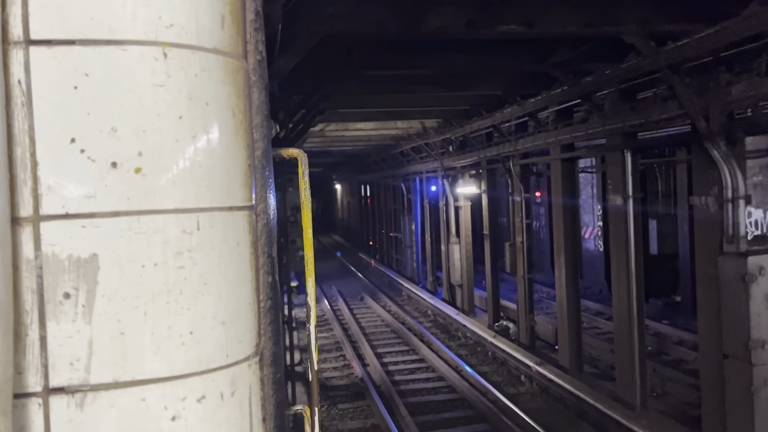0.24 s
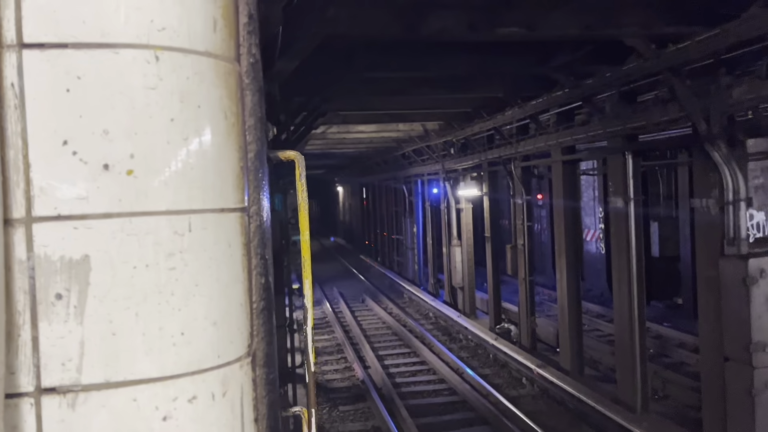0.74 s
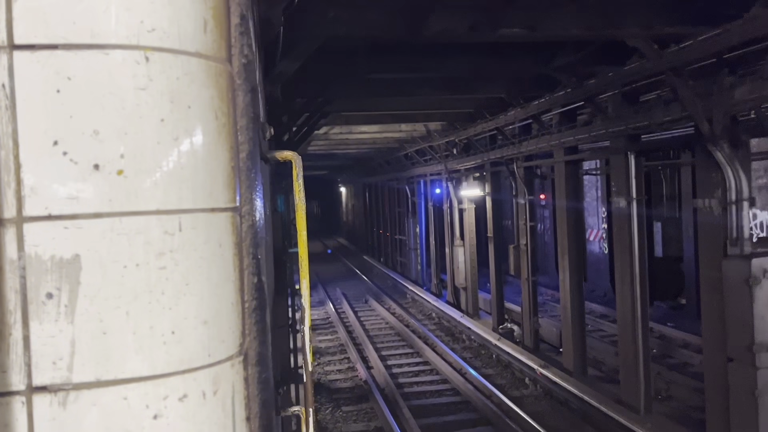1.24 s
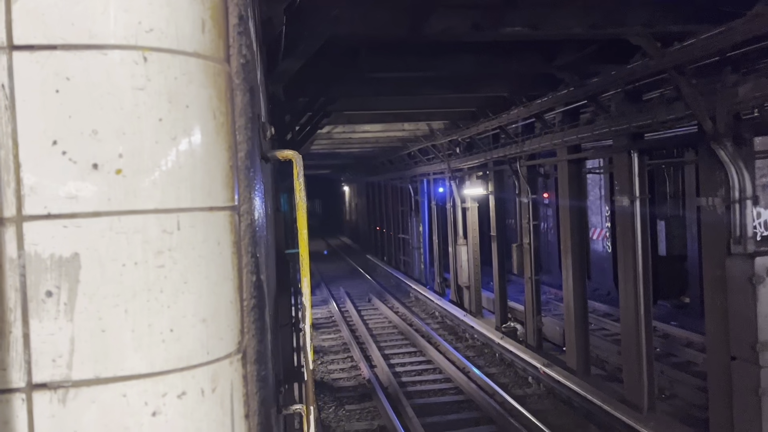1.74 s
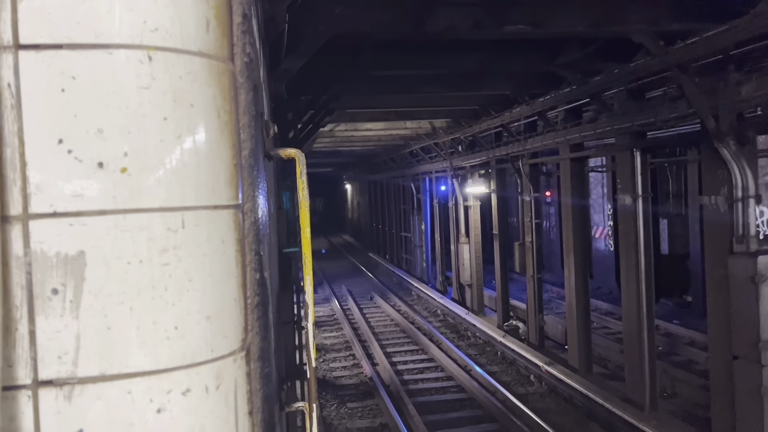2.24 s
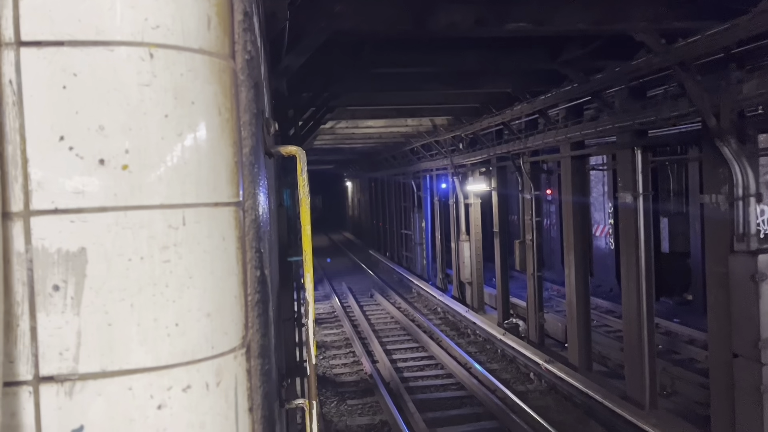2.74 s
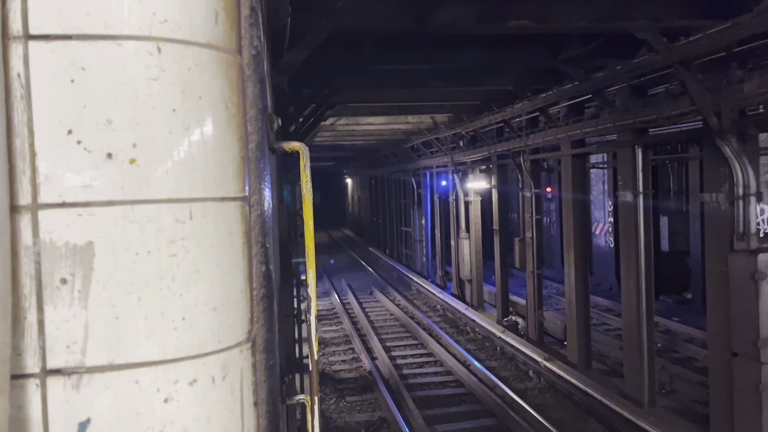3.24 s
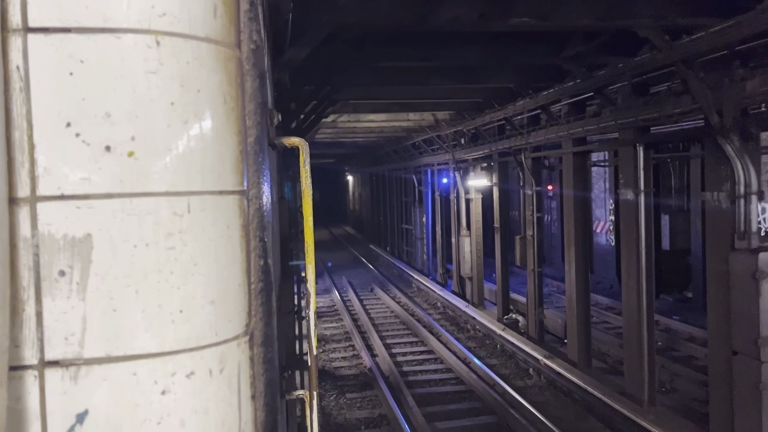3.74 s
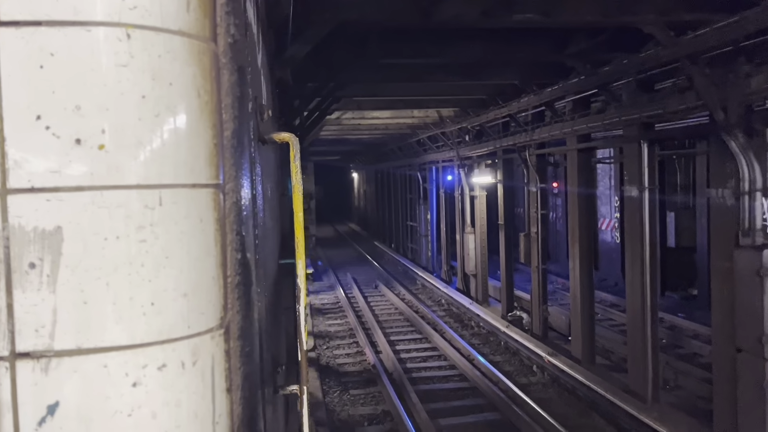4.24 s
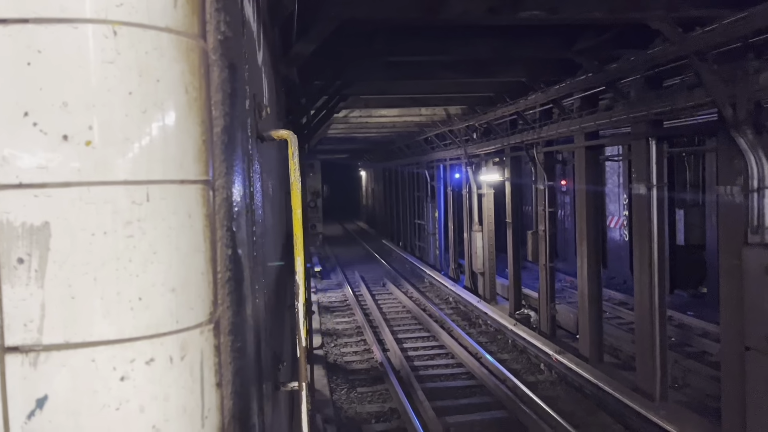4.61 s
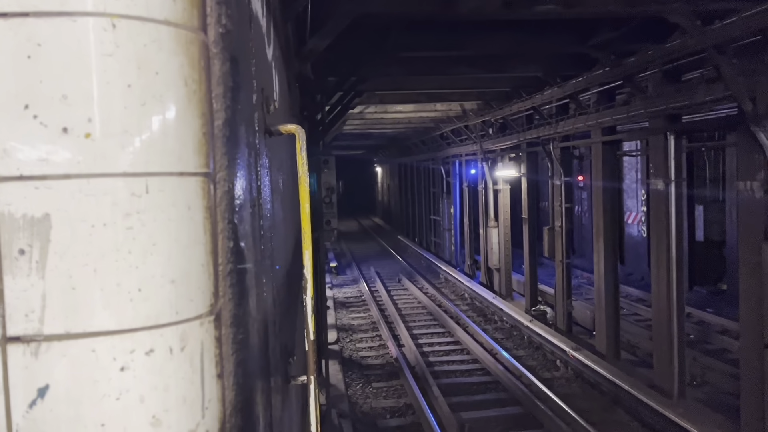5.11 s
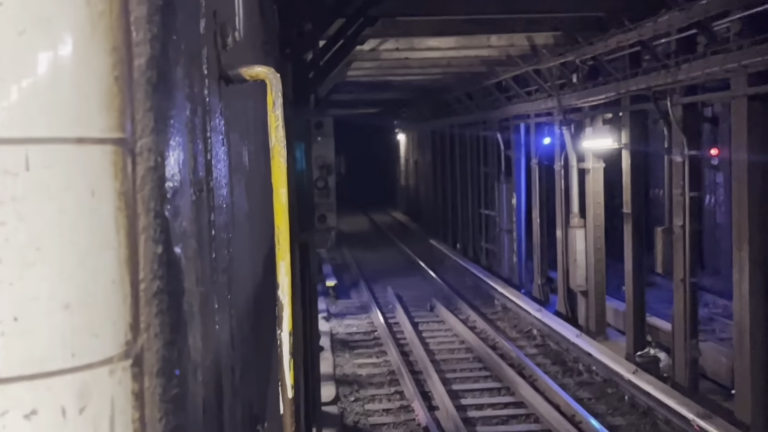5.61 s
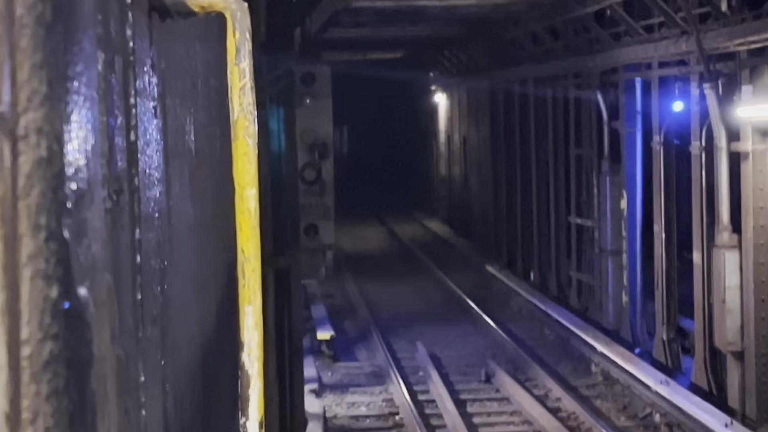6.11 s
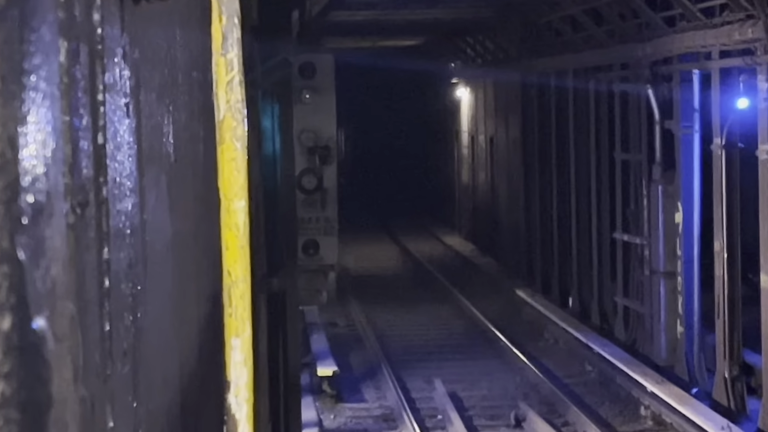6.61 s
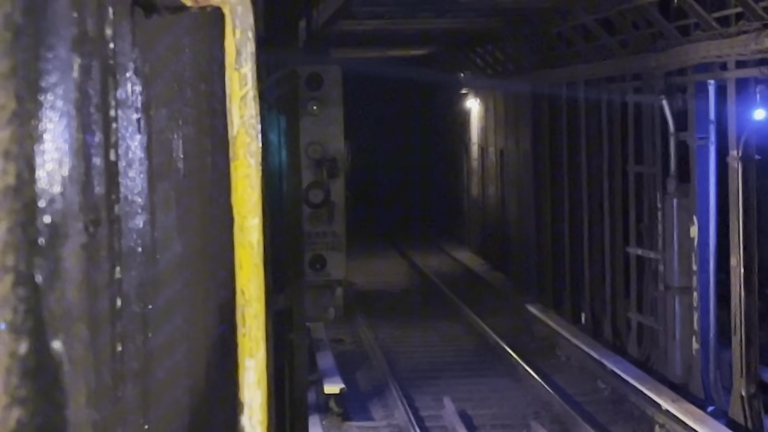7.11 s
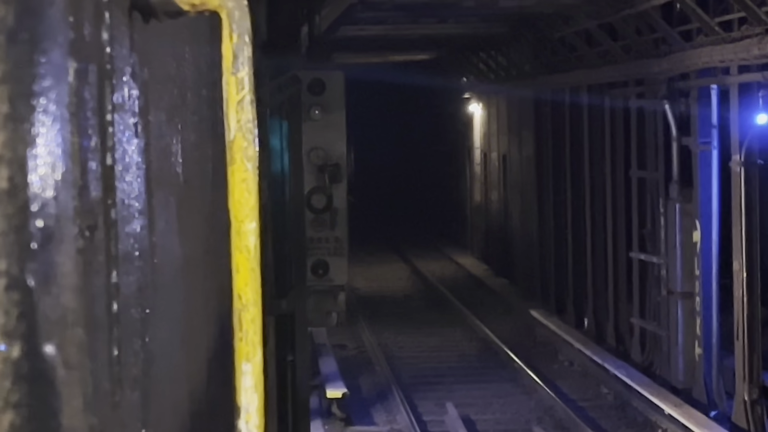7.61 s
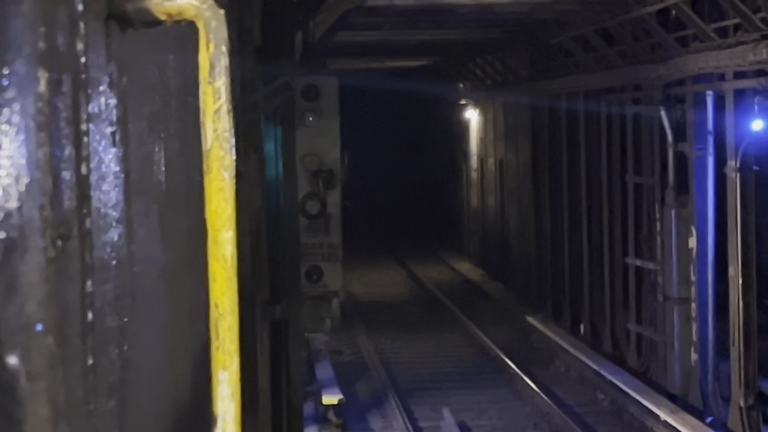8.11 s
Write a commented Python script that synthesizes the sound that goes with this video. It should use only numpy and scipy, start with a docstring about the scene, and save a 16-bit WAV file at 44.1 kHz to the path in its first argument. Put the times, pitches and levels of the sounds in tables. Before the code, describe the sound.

At the end of an underground platform, a phone picks up low tunnel roar and hiss while an unseen train approaches. Deep rumble beats unevenly, rails ring faintly and a motor whine swells, then fades as a finger creaks on the case. After five seconds the rumble surges; the pick-up narrows towards the tunnel, the whine returns, rolling hiss rises and a dull knock comes near the end.

```python
"""An unseen underground train draws nearer along a tunnel, heard by a phone at the end of the platform.
From the start a rumble beats unevenly in low tunnel resonances over roar and hiss; rails ring, gear buzzes,
a squeal slides. A motor whine swells, and as it starts to fade a finger creaks on the phone's case.
Near 5.5 s the pick-up narrows towards the tunnel, changing colour and stereo width; the rumble is stronger
by then, the whine swells again, rolling hiss comes up and a dull knock falls close to the end."""
import sys
import numpy as np
from scipy import signal
from scipy.fft import rfft, irfft, next_fast_len
from scipy.io import wavfile

SR = 44100
rng = np.random.default_rng(int(sys.argv[2]) if len(sys.argv) > 2 else 0)


def wav_record(signal):
    """Record a signal, one row per channel, as 16-bit PCM in the file named by sys.argv[1]."""
    frames = np.transpose(np.atleast_2d(signal))
    bounded = np.clip(frames, -1, 1)
    # unit amplitude maps onto the largest positive 16-bit level
    quanta = np.round(bounded * 32767).astype(np.int16)
    wavfile.write(sys.argv[1], SR, quanta)


N = 368235
SIZE = next_fast_len(N)
HZ = np.maximum(np.arange(SIZE // 2 + 1) * SR / SIZE, 1)   # frequency of each bin
T = np.arange(N) / SR   # seconds

NARROWING_S = (5.52, 5.6)   # start and end of the change of pick-up

# Microphone hiss colour. Each row: frequency in Hz, relative density in dB per Hz.
HISS_COLOUR = [(3000, -21), (5000, 0.5), (7000, 0), (9000, 4.5), (12500, 2), (14500, 5), (15800, -20)]
# Hiss level. Each row: time in seconds, level in dB.
HISS_LEVEL = [(0., -68), (1.8, -67), (4., -63), (8.35, -62)]
# Above in-step, the two sides of the hiss slip one cycle per turn.
HISS_IN_STEP_HZ, HISS_TURN_HZ = 4450, 7400

# Roar of tunnel and station through each pick-up. Each row: frequency in Hz, left and right relative density
# in dB per Hz, share alike in phase (-1 to 1), share alike with the right a quarter cycle ahead.
ROAR_WIDE = [(30.26, -14.5, -11, 0.96, -0.25), (93, -4.5, -6.5, 0.68, -0.2), (124, -26, -25, 0.063, -0.077),
             (141.5, -7, -5.5, 0.97, 0.26), (187, -7, -7, 0.91, 0.071), (307, -16, -18, 0.69, 0.78),
             (334, -19, -19, 0.89, 0.14), (515, -19, -19, 0.23, -0.15), (796, -21.5, -23.5, 0.18, -1.05),
             (1600, -28, -32.5, -0.36, 0.58), (2200, -34, -34, -0.012, -0.49),
             (3700, -36, -39.5, -0.3, 0.16), (5180, -42, -64, -0.45, 0.23), (9300, -60.5, -54, 0.71, 0.096)]
ROAR_NARROW = [(30.3, -18, -11, 0.93, 0.), (88.5, 2, 2.5, 1, -0.15), (117.5, -6.5, -7.5, 1, -0.32),
               (177.5, -6.5, -7.5, 0.95, 0.), (283, -17, -17, 0.79, -0.46), (355, -20, -22.5, 0.93, -0.23),
               (643, -25, -25, 0.3, 0.2), (830, -29.5, -42.5, 0.11, -0.18), (1350, -30.5, -29, -0.41, 0.23),
               (1910, -48, -37, -0.68, -0.31), (1890, -34.5, -34, 0.97, -0.054),
               (3860, -47, -42, .999, -0.004), (4800, -48.5, -50, .999, 0.), (6840, -46.5, -46, 0.94, .5)]
# Standing waves of the station that lift the roar. Each row: frequency in Hz, width in Hz, lift in dB.
STATION_MODES = [(156.7, 5, 7.5), (175, 4.2, 2), (190.5, 5.4, 3.5), (204, 6, 3), (222.1, 4.6, 5),
                 (253, 6, 3.5), (277, 6, 3), (308, 8.8, 5), (344, 26.5, 6), (388, 20, 5)]
ROAR_DB, NARROW_GAIN_DB = -36.5, 4.5   # the narrow pick-up lifts the roar from the tunnel

# Two low resonances of the station. Each row: frequency in Hz, width in Hz.
DRONE_MODES = [(111, 8.6), (127, 16.4)]
# Their levels, with chance beats written out. Each row: time in seconds, lower level in dB, upper level in dB.
DRONE_LEVEL = [(0., -45, -37.5), (0.199, -43, -33.5), (.5, -41, -40), (.9, -44.5, -36), (1.2, -37, -40.5),
               (1.45, -50, -36.5), (1.9, -35, -34), (2.55, -48, -39), (3., -37.5, -33.5), (3.6, -36.5, -37),
               (3.95, -41, -37.5), (4.3, -37.5, -33), (4.9, -37, -38.5), (5.15, -30, -43),
               (5.35, -45, -41.5), (5.65, -35.5, -33.5), (6.2, -35, -35.5), (6.4, -41, -47),
               (6.8, -37.5, -36.5), (7.5, -41.5, -40.5), (7.75, -46, -47), (8.25, -34.5, -37),
               (8.35, -34, -38)]
DRONE_SIDE_DB = -20.5   # part that is opposite in the two sides

# Buzz of electrical gear. Each row: multiple of the buzz frequency, relative level in dB.
BUZZ_LINES = [(14, -82), (17, -81), (26, -79.5), (27, -88.5), (28, -77.5)]
# Gain of the whole buzz. Each row: time in seconds, gain in dB.
BUZZ_GAIN = [(0., -6), (4., -5), (5.5, 5), (8.35, 4)]
BUZZ_HZ = 120.03   # twice the mains frequency

# Rushes of noise. Each row: time of the top in seconds, length in seconds, low and high edge in Hz, level in dB.
RUSTLES = [(2.405, 0.09, 5000, 10500, -61.5), (5.25, 0.42, 6040, 6600, -66),
           (5.272, 0.45, 5310, 10200, -63), (7.086, 0.16, 1298, 2190, -52.5), (4.15, 1.1, 3440, 7100, -68),
           (6.52, 0.22, 3500, 7400, -64)]
# One dull knock: time of the top in seconds, pitch there in Hz, pitch slope in Hz per second, length in seconds,
# level in dB, left minus right in dB.
KNOCK = (7.836, 700, -170000, .005, -36, -5)
# Slips of a finger on the case near the right port. Each row: start in seconds, peak in dB, top frequency in Hz.
CREAK_SLIPS = [(2.3265, -44, 7000), (2.3405, -40, 3000), (2.372, -31, 7000), (2.3855, -37, 9000),
               (2.391, -38, 4500), (2.395, -35, 10500), (2.399, -36, 10500), (2.403, -39, 10500),
               (2.409, -35, 10500), (2.414, -41, 10500), (2.4335, -39, 4000), (2.4535, -35, 2500)]
# Ringing of the case. Each row: frequency in Hz, level in dB against the click, 60 dB decay time in seconds.
CASE_MODES = [(1150, -2, .006), (9700, -10, .003)]
CREAK_PAN_DB = -7   # left minus right

# Level of the track's many rings. Each row: time in seconds, level in dB before the narrow pick-up shades it.
CLANGOUR_LEVEL = [(0., -47), (1.5, -48.5), (2.2, -48.5), (4.3, -48.5), (5.2, -53), (8.35, -56.5)]
CLANGOUR_HZ = (720, 1660)   # range the rings are spread around

# Rings that never stop. Each row: frequency in Hz, width in Hz, level in dB with wide pick-up, level in dB with
# narrow pick-up, left minus right in dB, share alike in the two sides.
STEADY_RINGS = [(1522, 14, -66, -64, -8, -0.93), (1392, 36, -83, -69, -8, -0.2),
                (1564, 18, -72, -68, -5, 0.5)]
# Rails ringing briefly under far wheels. Each row: time of the top in seconds, pitch there in Hz,
# glide in Hz per second, length in seconds, nominal level in dB, left minus right in dB.
RINGS = [(0.082, 1160, -300, 0.27, -49.5, -1), (0.309, 1144, -300, 0.17, -44, 3),
         (0.34, 1108, -100, 0.13, -42.5, -3), (0.553, 1153, 100, 0.13, -51, 5),
         (0.803, 1450, 100, .25, -55, 0), (1.055, 1558, 30, 0.31, -52, -8),
         (1.198, 1180, -150, 0.23, -48, 2), (1.263, 1145, 200, 0.14, -51, 0),
         (1.418, 1190, -300, 0.055, -46, 8), (1.848, 1332, 27, 0.48, -56, 9),
         (2.03, 1018, 50, 0.22, -43.5, 2), (2.117, 1527, 120, 0.33, -52, -4),
         (2.15, 1316, 30, 0.27, -55, 4), (2.346, 1131, -27, 0.42, -50, -1), (2.53, 1129, 32, 0.2, -43, 0),
         (2.671, 1041, -50, 0.09, -44, 2), (2.8, 1145, -50, 0.22, -47.5, 3), (3.2, 1570, 0, 0.19, -56, -4),
         (3.622, 1470, 62, 0.38, -54, -8), (3.876, 1452, 40, 0.41, -51.5, -6), (3.95, 1331, 0, .2, -53, 2),
         (4.059, 1387, 50, .15, -53, -4), (4.075, 1540, 150, 0.36, -51.5, -4),
         (5.054, 1549, -53, 0.22, -58, 17), (5.258, 1190, 10, 0.13, -51.5, 11),
         (6.205, 1404, -61, 0.33, -57, -10), (7.119, 1174, 8, 0.22, -54, 6),
         (7.35, 1545, 11, 0.26, -60, -10), (7.97, 1528, 12, 0.39, -58, -9)]

# Ringing strands in the rolling hiss. Each row: frequency in Hz, width in Hz, relative level in dB.
ROLLING_STRANDS = [(1680, 18, 0), (1702, 12, 1), (1744, 12, -3), (1772, 14, 1.5), (1801, 12, 0),
                   (1790, 300, 0)]
# Rolling level. Each row: time in seconds, level in dB before flutter.
ROLLING_LEVEL = [(0., -64), (5.52, -67.5), (5.62, -60.5), (6.15, -56), (6.6, -56.5), (7., -58), (7.4, -58),
                 (7.55, -59), (7.65, -53.5), (7.95, -58), (8.1, -60), (8.35, -59)]
ROLLING_PAN_DB, ROLLING_LIKENESS = -7, 0.68   # left minus right, share alike in the two sides

# A thin, rough squeal. Each row: time in seconds, pitch in Hz, level in dB before flutter.
SQUEAL = [(0., 3620, -58), (.5, 3530, -62.5), (1.2, 3620, -63.5), (1.7, 3700, -67), (2.1, 3800, -65.5),
          (2.4, 3980, -61), (2.46, 3980, -72), (2.5, 3580, -64), (3.2, 3600, -77), (6.2, 3780, -65.5),
          (8.35, 3700, -76)]

# Motor tones. Each row: frequency in Hz, width in Hz before any blur, relative level in dB.
WHINE_TONES = [(2531, 16, 3), (2594, 16, 2), (2463, 16, -2), (2580, 190, -5)]
# Two swells. Each row: full strength in seconds, start of the fade in seconds, level in dB before flutter.
WHINE_SWELLS = [(1.304, 2.28, -56.5), (5.6, 6.7, -59)]
WHINE_RISE_DB_PER_S, WHINE_FADE_DB_PER_S, WHINE_REST_DB = 8, 36, -83
WHINE_SECOND_S = 3.5   # the second swell's tones sound from here
WHINE_BLUR = 1.3   # they are rougher: this many times wider

# Rumble of the nearing train, with its chance beats written out. Each row: time in seconds, level of the lower
# resonance in dB, level of the upper resonance in dB, pitch of the upper resonance in Hz.
RUMBLE = [(0., -36, -35.5, 70.3), (.25, -34, -38, 67.2), (.8, -39.5, -42, 76.3), (1.4, -39, -40, 78),
          (1.75, -35.5, -36.5, 76), (2.1, -37.5, -36.5, 70.2), (2.55, -29.5, -42.5, 70.2),
          (3.2, -36, -38, 77), (3.6, -34, -35, 70.4), (4., -31, -35, 69.8), (4.3, -30, -33.5, 69.7),
          (4.7, -28, -33.5, 67.9), (4.95, -30, -32, 68.74), (5.15, -32.5, -24, 70.05),
          (5.35, -19.5, -26.5, 69.76), (5.5, -37, -20.5, 70), (5.65, -25.5, -28, 71),
          (5.8, -19.5, -26.5, 71.6), (6.05, -37, -28.5, 72.85), (6.3, -22.5, -29.5, 73.66),
          (6.5, -31, -33, 74.5), (6.65, -23, -22.5, 75.7), (6.88, -22, -26.5, 75.15),
          (7.02, -36, -20, 73.77), (7.15, -30, -24.5, 74.15), (7.33, -18.5, -30.5, 75),
          (7.52, -20.5, -46, 76), (7.63, -34.5, -25.5, 77.2), (7.83, -18.5, -26.5, 76.23),
          (8.02, -33.5, -28.5, 77.66), (8.25, -21.5, -27, 77.7), (8.35, -20, -36, 77.5)]
# Pitch of the lower resonance. Each row: time in seconds, pitch in Hz.
LOWER_PITCH = [(0., 58), (3., 56.62), (4.7, 58.01), (5.8, 59.63), (8.35, 59.84)]
RUMBLE_WIDTHS_HZ = (6.5, 8.3, 11, 36)   # lower, upper, third, and a broad boom
THIRD_HZ, THIRD_MODE_DB = 93.2, -11   # the third follows the upper one, this much weaker
BOOM_HZ, BOOM_DB = 61.67, -4.5   # the boom follows the mean dB of lower and upper
RUMBLE_SIDE_DB = -27.5   # part that is opposite in the two sides
SETTLING_S, SETTLED_TONE = (4.5, 5.8), 1.6   # a steady tone joins the noise of lower and upper as the train nears


def from_db(db):
    """Gain of a level in dB."""
    return 10 ** (np.asarray(db) / 20)


def rms_one(x):
    """Scale a sound to rms 1, both sides together."""
    return x / np.sqrt(np.mean(x ** 2) + 1e-20)


def in_time(rows):
    """The columns of a time curve, sample by sample."""
    s, *columns = np.transpose(rows)
    return [np.interp(T, s, c) for c in columns]


def in_pitch(rows):
    """The columns of a spectrum, bin by bin along log frequency."""
    hz, *columns = np.transpose(rows)
    return [np.interp(np.log(HZ), np.log(hz), c) for c in columns]


def panned(pan_db):
    """Gains of the two sides for a left-minus-right level."""
    return from_db(np.array([[.5], [-.5]]) * pan_db)


def peak(hz, width_hz):
    """Gain per bin of a resonance passed twice; half gain at the edges of its width."""
    return 1 / (1 + (2 * (HZ - hz) / width_hz) ** 2)


def peaks(rows, blur=1):
    """Gain per bin of several resonances together."""
    return sum(from_db(db) * peak(hz, width_hz * blur) for hz, width_hz, db in rows)


def swell(s, length):
    """A smooth bell-shaped rise and fall around a moment."""
    return np.exp(-.5 * ((T - s) / (length / 3)) ** 2)


def stereo_noise(left, right, alike):
    """Noise with a gain per bin and side; alike is the complex share that the right takes from the left."""
    shared, own = rfft(rng.standard_normal((2, SIZE)))
    alike = alike / np.maximum(np.abs(alike), 1)
    own_share = np.sqrt(np.maximum(1 - np.abs(alike) ** 2, 0))
    sides = [left * shared, right * (alike * shared + own_share * own)]
    return irfft(np.array(sides), SIZE)[:, :N]


def wobble(width_hz):
    """Complex slow noise: multiplied onto a tone it spreads the tone into a narrow band."""
    step = 16   # drawn once in so many samples, then joined by straight lines
    size = N // step + 2
    hz = np.fft.fftfreq(size, step / SR)
    white = np.dot((1, 1j), rng.standard_normal((2, size)))
    slow = np.fft.ifft(white / (1 + (2 * hz / width_hz) ** 2))
    return np.interp(np.arange(N) / step, np.arange(size), slow / slow.real.std())


def flutter(depth_db, width_hz):
    """A gain that wavers by chance."""
    return from_db(depth_db * np.real(wobble(width_hz)))


def evened_beats(width_hz, tone, floor, evenness, side_db):
    """Slow beats, partly evened out, with a weaker part that is opposite in the two sides."""
    shared, own = tone + wobble(width_hz), wobble(width_hz)
    evened = shared / (np.abs(shared) + floor) ** evenness
    return evened + from_db(side_db) * own * [[1], [-1]]


def through_pick_up(wide, narrow):
    """Turn from the wide to the narrow pick-up with an equal-power crossfade."""
    turn = np.interp(T, NARROWING_S, (0, np.pi / 2))
    return np.cos(turn) * wide + np.sin(turn) * narrow


def hiss(level_db):
    """One noise reaches both sides; the treble slips in phase as with a lag, so their sum cancels in bands."""
    bass_cut = HZ ** 2 / (HZ ** 2 + 2500 ** 2)
    colour = from_db(in_pitch(HISS_COLOUR)[0]) * bass_cut
    slip = 2 * np.pi * np.maximum(HZ - HISS_IN_STEP_HZ, 0) / HISS_TURN_HZ
    return from_db(level_db) * rms_one(stereo_noise(colour, colour, np.exp(1j * slip)))


def roar(level_db):
    """Steady noise lifted by standing waves, coloured by the wide pick-up and then the narrow one."""
    heard = []
    lift = sum((from_db(db) - 1) * peak(hz, width_hz) for hz, width_hz, db in STATION_MODES)
    for table in (ROAR_WIDE, ROAR_NARROW):
        left_db, right_db, same, ahead = in_pitch(table)
        top_fade = 1 / (1 + (HZ / table[-1][0]) ** 12)   # falls away around the table's last frequency
        shape = (1 + lift) * top_fade
        noise = stereo_noise(from_db(left_db) * shape, from_db(right_db) * shape, same + 1j * ahead)
        heard.append(rms_one(noise))
    return from_db(level_db) * through_pick_up(heard[0], from_db(NARROW_GAIN_DB) * heard[1])


def drone(evenness):
    """Noise in the station's low resonances, its own chance beats partly evened out under the written ones."""
    out = 0
    for (hz, width_hz), level_db in zip(DRONE_MODES, in_time(DRONE_LEVEL)):
        beats = evened_beats(width_hz, 0, 0.32, evenness, DRONE_SIDE_DB)
        out = out + from_db(level_db) * rms_one(np.real(beats * np.exp(2j * np.pi * hz * T)))
    return out


def buzz():
    """Electrical gear hums at high multiples of twice the mains frequency, all wavering together."""
    waver = 1 + 0.45 * wobble(width_hz=14)
    lines = 0
    for multiple, db in BUZZ_LINES:
        turns = multiple * BUZZ_HZ * T + rng.random()
        lines = lines + from_db(db) * np.exp(2j * np.pi * turns)
    return from_db(in_time(BUZZ_GAIN)[0]) * np.sqrt(2) * np.real(lines * waver)


def rustles():
    """Rushes of band-limited noise that rise and fall smoothly."""
    white = rng.standard_normal((2, N))
    out = np.zeros((2, N))
    for s, length, low_hz, high_hz, level_db in RUSTLES:
        band_pass = signal.butter(4, [low_hz, high_hz], "band", fs=SR, output="sos")
        out += from_db(level_db) * swell(s, length) * rms_one(signal.sosfilt(band_pass, white))
    return out


def knock():
    """One very short, dull tone that drops in pitch."""
    s, hz, slope, length, level_db, pan_db = KNOCK
    turns = hz * (T - s) + slope * (T - s) ** 2 / 2
    return panned(pan_db) * from_db(level_db) * swell(s, length) * np.cos(2 * np.pi * turns)


def creak():
    """Each slip of the finger is one click that rings the case, band-limited by how sharp it is."""
    out = np.zeros(N)
    n = np.arange(400)
    t = n / SR
    click = -.84 ** n   # a negative jolt that dies away fast
    for hz, db, t60 in CASE_MODES:
        click = click - from_db(db - 60 * t / t60) * np.sin(2 * np.pi * hz * t)
    for s, level_db, top_hz in CREAK_SLIPS:
        band_pass = signal.butter(3, [400, top_hz], "band", fs=SR, output="sos")
        tick = signal.sosfilt(band_pass, click)
        at = round(s * SR)
        out[at:at + len(tick)] += from_db(level_db) * tick / np.abs(tick).max()
    return panned(CREAK_PAN_DB) * out


def clangour(level_db, flare_db, count):
    """Many damped rings of rails and wheels, each flaring and fading by chance."""
    out = 0
    for hz, (detune, pan) in zip(np.geomspace(*CLANGOUR_HZ, count), rng.normal(0, 1, (count, 2))):
        shape = peak(hz * (1 + .008 * detune), .085 * hz)
        flare = from_db(flare_db * np.tanh(np.real(wobble(width_hz=5))))   # no ring flares far out of the rest
        ring = rms_one(stereo_noise(shape, shape, 0.36))
        out = out + flare * panned(1.0 + pan) * ring * (1000 / hz) ** 0.36   # higher rings are weaker
    shade_db = np.interp(T, NARROWING_S, (0, -4))   # the narrow pick-up turns away from them
    return from_db(level_db + shade_db) * rms_one(out)


def steady_rings():
    """Rails that never stop ringing: narrow noise bands with a slow flutter."""
    out = 0
    for hz, width_hz, wide_db, narrow_db, pan_db, alike in STEADY_RINGS:
        level = from_db(np.interp(T, NARROWING_S, (wide_db, narrow_db))) * flutter(1.1, width_hz=2.5)
        shape = peak(hz, width_hz)
        out = out + level * panned(pan_db) * rms_one(stereo_noise(shape, shape, alike))
    return out


def brief_rings():
    """Rails excited by far wheels: short gliding tones that waver differently in the two sides."""
    out = np.zeros((2, N))
    waver = .68 + .55 * np.array([wobble(width_hz=80), wobble(width_hz=80)])
    for s, hz, glide, length, level_db, pan_db in RINGS:
        turns = hz * T + glide * (T - s) ** 2 / 2 + rng.random()
        tone = swell(s, length) * np.exp(2j * np.pi * turns)
        out += from_db(level_db) * panned(pan_db) * np.real(tone * waver)
    return out


def rolling():
    """Fluttering noise in a cluster of rail resonances."""
    shape = peaks(ROLLING_STRANDS)
    level = from_db(in_time(ROLLING_LEVEL)[0]) * flutter(1.2, width_hz=4.4)
    return level * panned(ROLLING_PAN_DB) * rms_one(stereo_noise(shape, shape, ROLLING_LIKENESS))


def squeal():
    """Rough strands around a sliding pitch, unlike in the two sides until the pick-up has narrowed."""
    hz, level_db = in_time(SQUEAL)
    tone = np.exp(2j * np.pi * np.cumsum(hz) / SR)
    left, other = wobble(width_hz=300), wobble(width_hz=170)
    right = np.where(T < NARROWING_S[1], other, left)
    return from_db(level_db) * flutter(1.34, width_hz=13) * np.real(tone * np.array([left, right]))


def whine_level():
    """Each swell rises slowly, holds and fades fast to a faint rest; in dB."""
    swells = []
    for full, fade, db in WHINE_SWELLS:
        rise_db = WHINE_RISE_DB_PER_S * np.maximum(full - T, 0)
        fade_db = WHINE_FADE_DB_PER_S * np.maximum(T - fade, 0)
        swells.append(db - rise_db - fade_db)
    return np.maximum(np.max(swells, axis=0), WHINE_REST_DB)


def whine(level_db):
    """A cluster of rough motor tones made of narrow noise, unlike in the sides until the pick-up narrows."""
    shape, blurred = peaks(WHINE_TONES), peaks(WHINE_TONES, WHINE_BLUR)
    first = rms_one(stereo_noise(shape, shape, -0.46))
    second = rms_one(stereo_noise(blurred, blurred, 0.15))
    wide = np.where(T < WHINE_SECOND_S, first, second)
    narrow = rms_one(stereo_noise(blurred, blurred, 0.97))
    return from_db(level_db) * flutter(1.45, width_hz=12) * through_pick_up(wide, narrow)


def rumble(evenness):
    """Rolling noise in the tunnel resonances, its own chance beats partly evened out under the written ones."""
    out = 0
    lower_db, upper_db, upper_hz = in_time(RUMBLE)
    pitches = (in_time(LOWER_PITCH)[0], upper_hz, THIRD_HZ + 0 * T, BOOM_HZ + 0 * T)
    levels = (lower_db, upper_db, upper_db + THIRD_MODE_DB, (lower_db + upper_db) / 2 + BOOM_DB)
    settled = np.interp(T, SETTLING_S, (0, SETTLED_TONE))
    tones = (settled, settled, 0, 0)
    for hz, width_hz, level_db, tone in zip(pitches, RUMBLE_WIDTHS_HZ, levels, tones):
        beats = evened_beats(width_hz, tone, 0.36, evenness, RUMBLE_SIDE_DB)
        carrier = np.exp(2j * np.pi * np.cumsum(hz) / SR)
        out = out + from_db(level_db) * rms_one(np.real(beats * carrier))
    return out


def scene():
    """Hiss, station, small noises and train summed."""
    station = roar(ROAR_DB) + drone(evenness=0.62) + buzz()
    small_noises = rustles() + knock() + creak()
    track = clangour(in_time(CLANGOUR_LEVEL)[0], flare_db=4.5, count=16) + steady_rings() + brief_rings()
    train = track + rolling() + squeal() + whine(whine_level()) + rumble(evenness=0.72)
    return hiss(in_time(HISS_LEVEL)[0]) + station + small_noises + train


def record(dry):
    """The microphone drops the deepest bass; the top is cut steeply."""
    bass_cut = signal.butter(3, 40, "high", fs=SR, output="sos")
    top_cut = signal.cheby2(12, 70, 16000, fs=SR, output="sos")   # 70 dB down from 16 kHz
    return signal.sosfilt(top_cut, signal.sosfilt(bass_cut, dry))


dry = scene()
out = record(dry)
wav_record(out)
```